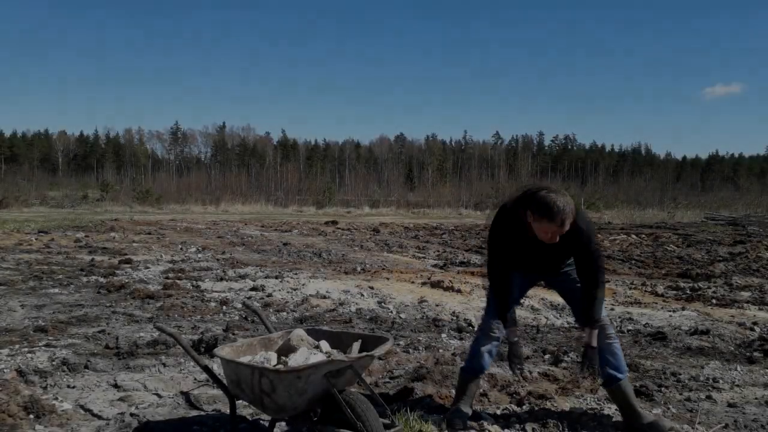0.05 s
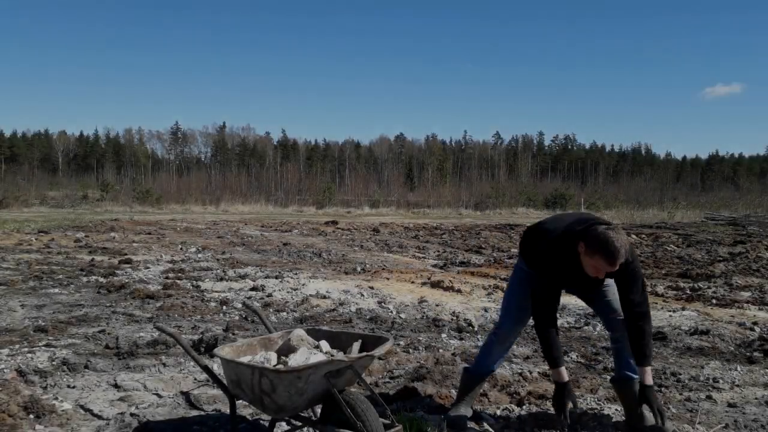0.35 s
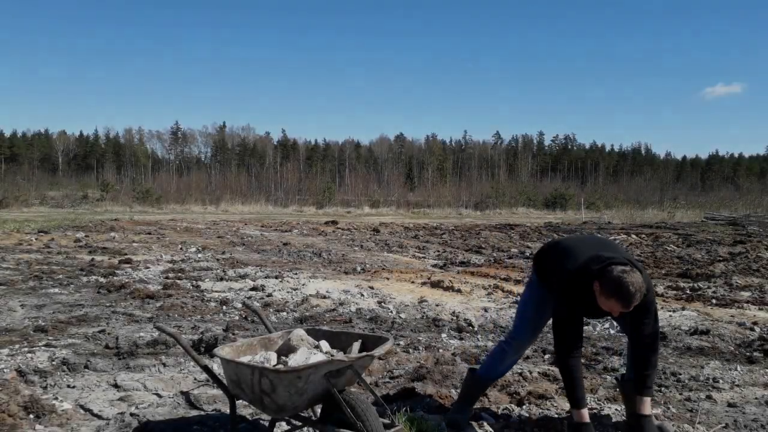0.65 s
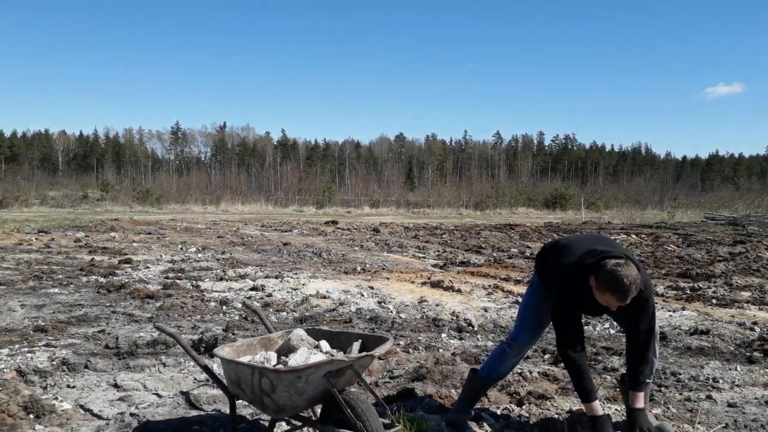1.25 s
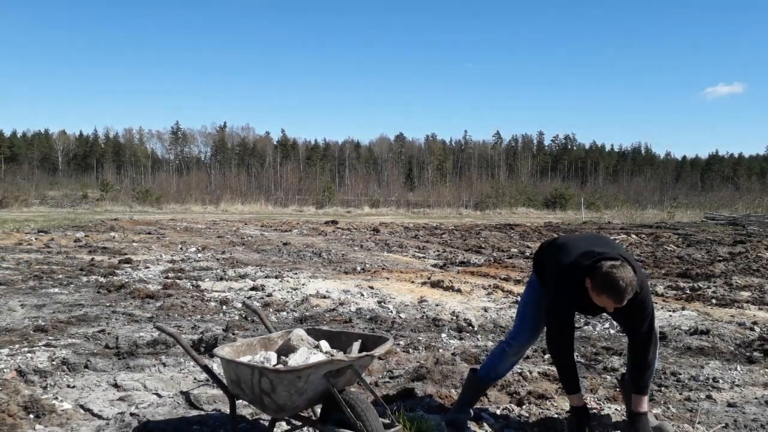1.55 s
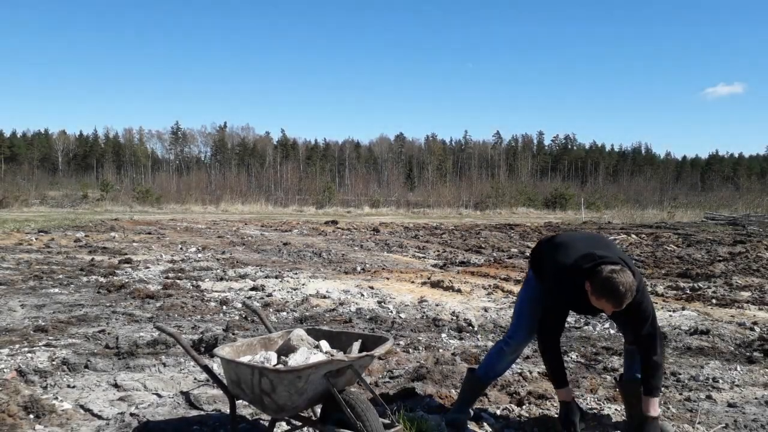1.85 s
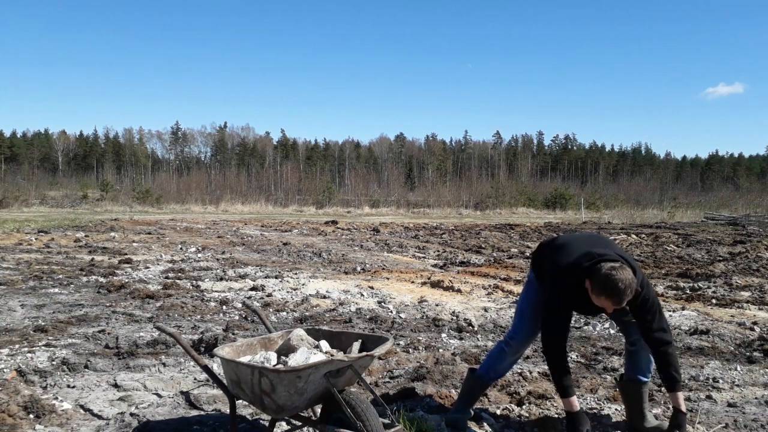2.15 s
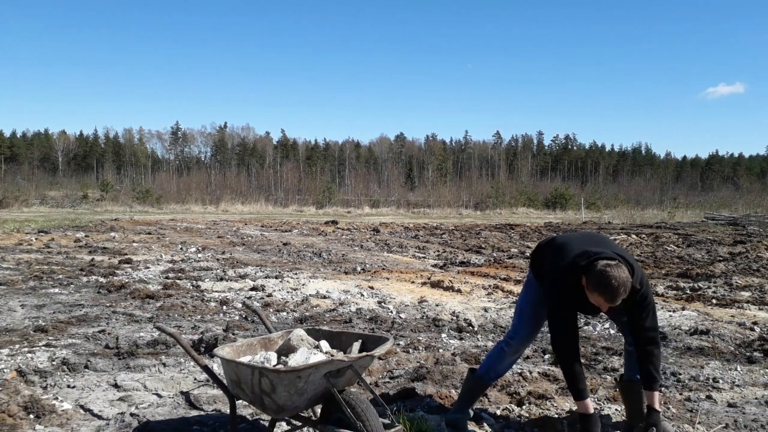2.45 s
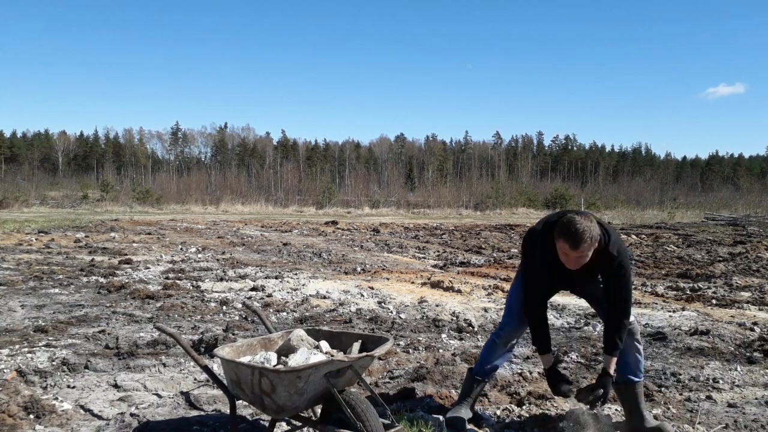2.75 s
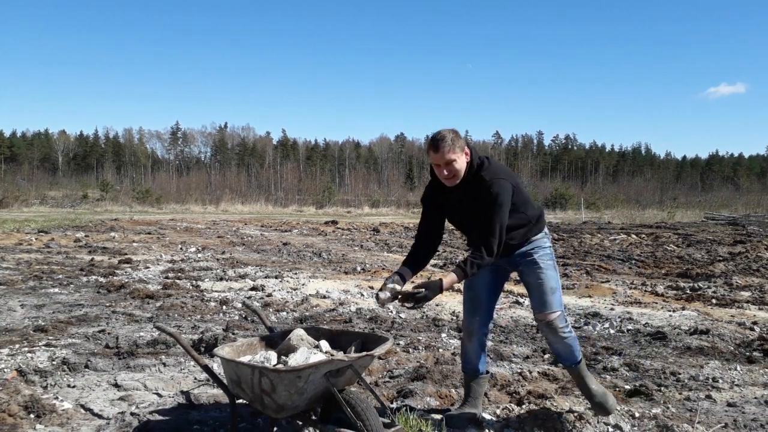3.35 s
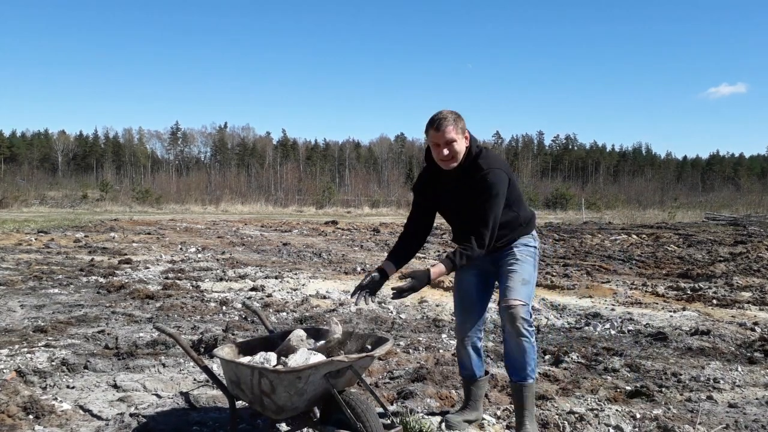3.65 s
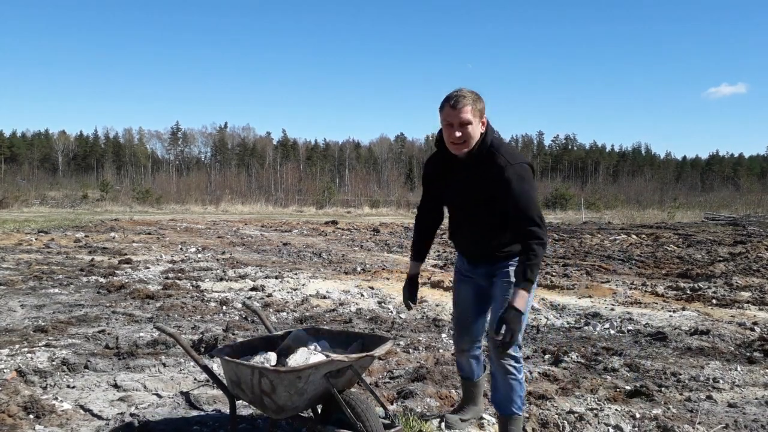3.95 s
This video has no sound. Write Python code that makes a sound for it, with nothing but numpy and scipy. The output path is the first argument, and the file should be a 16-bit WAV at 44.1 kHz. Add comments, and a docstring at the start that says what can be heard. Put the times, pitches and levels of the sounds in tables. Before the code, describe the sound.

Stones clatter and settle in a wheelbarrow in the first 0.3 seconds. A boot scuffs soil around 0.8 seconds, followed by sparse soft knocks, pebble taps and faint clothing rustle. A heavier knock comes at 2.4 seconds. From 3.7 seconds, several stones crack loudly onto the load, briefly ringing the tub. Throughout, wind flutters on the microphone in low, dull puffs over a faint rush of distant forest.

```python
"""Stones are gathered on an open field and tossed into a loaded wheelbarrow. First the load clatters and
settles while clothes rustle. A boot scuffs the soil, then pebbles tap, grit ticks and dull knocks sound now and
then. Near the end a run of stones cracks onto the load and rings the tub. Throughout, wind flutters on the
microphone in low, dull puffs over the faint rush of a far forest."""
import sys
import numpy as np
from scipy.fft import rfft, irfft, next_fast_len
from scipy.io import wavfile
from scipy.ndimage import map_coordinates

SR = 44100
rng = np.random.default_rng(int(sys.argv[2]) if len(sys.argv) > 2 else 0)


def wav_out(sig):
    """Save sig, one row per channel (or a flat mono array), as 16-bit PCM at SR to the path in sys.argv[1]."""
    wavfile.write(sys.argv[1], SR, np.round(np.clip(np.atleast_2d(sig).T, -1, 1) * 32767).astype(np.int16))


N = 176400
ATTACK_S = 0.00052

# Stone impacts. Each row: start in seconds, crack, clatter and chip levels in dB,
# clatter and chip T60 in seconds.
IMPACTS = [(-.002,-45,-34.5,-61,0.17,0.11),(.084,-62,-46,-70,0.19,0.055),(0.2016,-63,-47,-69,0.031,.03),(3.661,-54,-41.5,-44,0.038,.073),(3.6693,-50,-31.5,-49.5,0.075,.04),(3.6954,-25.5,-26.5,-37.5,0.054,.04),(3.702,-35,-25.5,-50,0.062,0.1),(3.7338,-36,-38,-52.5,.06,0.14),(3.777,-36,-33.5,-56,.05,.05),(3.784,-26,-28,-43.5,0.079,0.074),(3.799,-34.5,-32.5,-56,0.087,0.11),(3.8424,-44,-35.5,-73,.09,.1),(3.9265,-34,-35.5,-55,0.1,0.038)]
# Spectra of the three parts. Each row: frequency in Hz, density in dB.
CRACK_SPECTRUM = [(400,-8),(900,3),(2500,6),(5500,-14.5),(8000,-15),(16000,-36)]
CLATTER_SPECTRUM = [(150,-39),(400,10.5),(750,-1),(1000,0.5),(1500,-5),(2300,-3.5),(3100,-11),(4500,-21),(7000,-32),(16000,-56)]
CHIP_SPECTRUM = [(800,2.5),(2500,-3),(4200,-1),(5500,3),(7300,-7),(8300,-3),(9400,3.5),(10700,-5),(12000,-4),(14000,-8),(16000,-13)]
def stones():
    """Impact excitation: each contact cracks, rattles the load and chips the stone."""
    cracks = sum(amp(db) * strike(s, t60=0.015) for s, db, *_ in IMPACTS)
    clatter = sum(amp(db) * strike(s, t60) for s, _, db, _, t60, _ in IMPACTS)
    chips = sum(amp(db) * strike(s, t60) for s, _, _, db, _, t60 in IMPACTS)
    return (cracks * noise(CRACK_SPECTRUM)
            + clatter * noise(CLATTER_SPECTRUM, grain_db=2.5)
            + chips * noise(CHIP_SPECTRUM, grain_db=-2.5))


# Modes of the tub. Each row: frequency in Hz, relative level in dB, T60 in seconds.
TUB_MODES = [(743,8,0.14),(1177,-4.5,0.39),(1357,-2,0.27),(1440,-8,0.3),(1666,-6,0.2),(1854,-6,.22),(1956,-2.5,0.26),(2250,-12,0.25),(2430,-6,.18),(2640,-17,0.12),(3400,-8,0.15)]
def tub():
    """Damped modal vibration: each impact rings the tub, which the shifting load detunes."""
    t = clock()
    out = np.zeros(N)
    for s, _, clatter_db, *_ in IMPACTS:
        near = (t > s) & (t < s + .5)
        age = t[near] - s
        attack = 1 - np.exp(-age / ATTACK_S)
        for hz, db, t60 in TUB_MODES:
            size, phase, detune = rng.standard_normal(3)
            envelope = attack * amp(clatter_db + db + 2 * size - 60 * age / t60)
            out[near] += envelope * np.sin(2 * np.pi * (hz * (1 + .009 * detune) * age + phase))
    return amp(-19) * out


# Dull knocks. Each row: time in seconds, peak level in dB, pitch in Hz.
DULL_KNOCKS = [(.1455,-28,533),(.204,-34,1000),(.443,-40,600),(.939,-35,560),(.979,-32,520),(1.137,-43,570),(1.205,-39,590),(1.302,-40,560),(1.826,-35,560),(2.4402,-22.5,877),(2.4545,-28,564),(3.7045,-16.5,800),(3.7865,-22,750)]
def knocks():
    """Heavy damping: a dull knock dies within a few cycles."""
    return thuds(DULL_KNOCKS, rise=0.22, fall=1.42, sag=0.14)


# Modes of a stone edge. Each row: frequency in Hz, relative level in dB, T60 in seconds.
EDGE_MODES = [(8200,-4,0.049),(10600,-2,0.041),(10670,0.5,0.046),(13600,-2,.032),(14000,0,.032)]
def stone_edge(start_s=3.696, level_db=-39):
    """Free vibration: a hard edge, hit squarely, rings briefly and very high."""
    return sum(amp(level_db + db) * strike(start_s, t60) * np.sin(2 * np.pi * hz * clock())
               for hz, db, t60 in EDGE_MODES)


# Pebble taps. Each row: start in seconds, level in dB.
PEBBLE_TAPS = [(0.204,-49),(2.152,-55),(2.310,-48.5),(2.346,-46),(3.662,-36),(3.763,-40)]
# Their spectrum. Each row: frequency in Hz, density in dB.
PEBBLE_SPECTRUM = [(600,-11),(1400,-10),(1850,6),(2300,-5.5),(4000,-26),(9000,-32),(16000,-33)]
def pebbles():
    """Light impacts: small stones collide in the hands."""
    return sum(amp(db) * strike(s, t60=0.068) for s, db in PEBBLE_TAPS) * noise(PEBBLE_SPECTRUM)


# Grit ticks. Each row: start in seconds, level in dB, T60 in seconds.
GRIT_TICKS = [(0.037,-39.5,.07),(.057,-44.5,0.095),(.086,-66,.1),(0.125,-47.5,.046),(.138,-50,0.022),(0.1448,-41,0.063),(0.205,-51,.015),(0.215,-56,.048),(.379,-61,0.055),(0.98,-64.5,.08),(1.48,-59.5,0.031),(2.154,-58.5,.035),(2.255,-52.5,0.017),(2.313,-55,.025),(2.408,-60,.025),(2.508,-63,.03),(2.567,-64,.025),(3.271,-59,.015),(3.603,-43,0.0096),(3.723,-45.5,0.068),(3.8315,-43,0.018)]
# Their spectrum. Each row: frequency in Hz, density in dB.
GRIT_SPECTRUM = [(500,-1.5),(2000,-4.5),(5000,-7.5),(7500,-12),(8700,-9),(9400,-2),(11500,-9),(13500,-11),(16000,-17)]
def grit():
    """Granular contact: grit crunches in short broadband bursts."""
    envelope = sum(amp(db) * strike(s, t60) for s, db, t60 in GRIT_TICKS)
    return envelope * noise(GRIT_SPECTRUM, grain_db=1)


# Pushes of the boot. Each row: start and end in seconds, relative level in dB.
BOOT_PUSHES = [(.59,.75,-61),(.7,.77,-55.5),(.781,.81,-46),(.826,.85,-44),(.853,.886,-42.5)]
# Spectrum of the soil. Each row: frequency in Hz, density in dB.
SOIL_SPECTRUM = [(250,5.5),(550,5),(1200,-0.5),(1700,-4),(2600,0),(3600,-10),(5000,-11),(7500,-21),(9500,-12),(13000,-20),(16000,-28)]
# Resonances of loose stones. Each row: frequency and bandwidth in Hz, gain in dB.
LOOSE_STONES = [(545,114,7),(1243,35,1.5),(1740,67,-0.5),(2340,100,-13),(2880,170,-14),(3680,100,-6)]
# Single catches of the sole. Each row: start in seconds, relative level in dB, pitch in Hz.
SOLE_CATCHES = [(.778,-39,603),(0.7857,-48,1160),(.786,-54,2920),(0.823,-48.5,2920),(0.854,-46,1230),(0.8552,-43,2340),(0.8838,-45,1240)]
def boot():
    """Stick-slip friction: the sole slides through soil, and each stone it catches rasps."""
    def resonances(f):
        return sum((-1) ** k * amp(db) * 1j * f * width / (hz * hz - f * f + 1j * f * width)
                   for k, (hz, width, db) in enumerate(LOOSE_STONES))

    slip = amp(-2) * noise(SOIL_SPECTRUM, grain_db=1)
    fine_catches = amp(-2.5) * unit(filtered(ticks(per_s=350), resonances))
    rasps = sum(amp(db) * strike(s, t60=0.034) * band(hz, width=0.18) for s, db, hz in SOLE_CATCHES)
    return strokes(BOOT_PUSHES, rise_s=0.0047, fall_s=.011) * (slip + fine_catches) + 2 * rasps


# Twists of the soles. Each row: start and end in seconds, level in dB.
SOLE_TWISTS = [(.17,.30,-69),(.30,.42,-69.5),(.44,.57,-67.5),(.69,.83,-64.5),(.87,.94,-67.5),(2.88,3.02,-69.5),(3.16,3.4,-79),(3.932,3.948,-49)]
# Spectrum of the gravel. Each row: frequency in Hz, density in dB.
GRAVEL_SPECTRUM = [(1200,-11),(1900,6.5),(2900,-3.5),(3500,-3),(4200,-12),(5100,-18),(6500,-29),(12000,-34)]
def gravel():
    """Granular friction: fine gravel grinds softly as the weight shifts."""
    return strokes(SOLE_TWISTS, rise_s=0.0081, fall_s=0.019) * noise(GRAVEL_SPECTRUM, grain_db=3)


# Body movements. Each row: start and end in seconds, level in dB.
MOVES = [(0,.1,-61),(.17,.32,-72.5),(.6,.67,-62),(.74,.93,-73),(1.02,1.075,-65.5),(1.1,1.26,-72),(1.28,1.44,-75.5),(1.45,1.48,-73),(1.595,1.635,-66),(1.67,1.76,-73.5),(1.89,1.915,-68.5),(2.16,2.37,-69),(2.205,2.25,-64),(2.42,2.6,-73.5),(2.89,3.01,-72),(3.365,3.52,-67.5),(3.4,3.46,-64.5),(3.75,3.99,-67)]
# Spectrum of the fabric. Each row: frequency in Hz, density in dB.
CLOTH_SPECTRUM = [(1200,2.5),(2800,-0.5),(4500,-6.5),(6000,-5),(8400,-7),(9400,1.5),(12500,-3),(14000,-8.5),(16000,-13.5)]
def clothes():
    """Sliding friction: fabric swishes and crinkles with each reach."""
    swish = noise(CLOTH_SPECTRUM, grain_db=3)
    crinkle = amp(-8) * coloured(ticks(per_s=310), CLOTH_SPECTRUM)
    flicker = amp(1.8 * wobble(60))
    return strokes(MOVES, rise_s=0.038, fall_s=0.036) * flicker * (swish + crinkle)


# Wind strength. Each row: time in seconds, relative level in dB.
WIND_STRENGTH = [(0,-42.5),(.11,-44),(0.161,-40),(.3,-34.5),(.36,-42.5),(0.461,-40.5),(.62,-40.5),(0.771,-38.5),(.85,-52),(.95,-35.5),(1.08,-41),(1.328,-40),(1.409,-48.5),(1.6,-44),(1.74,-42.5),(1.86,-34.5),(1.93,-43),(2.02,-44),(2.18,-40),(2.34,-37.5),(2.6,-41),(2.79,-40.5),(2.86,-45),(3.0,-43.5),(3.2,-45.5),(3.36,-50),(3.47,-42.5),(3.54,-39.5),(3.63,-44.5),(3.729,-34),(3.902,-36.5),(4,-46)]
# Spectrum of the buffeting. Each row: frequency in Hz, density in dB.
BUFFET_SPECTRUM = [(20,-49),(40,-23),(62,-6),(85,-1.5),(130,1),(200,-5.5),(300,-13),(450,-23.5),(700,-37),(1200,-56),(2500,-95)]
# Single puffs. Each row: time in seconds, peak level in dB, pitch in Hz.
WIND_PUFFS = [(.146,-19.5,245),(.156,-22.5,230),(.205,-26.5,176),(.257,-19.5,141),(.291,-25.5,160),(.402,-24.5,271),(.444,-30,267),(.462,-27,202),(.941,-34,199),(.966,-26,222),(.980,-17,195),(1.045,-18.5,183),(1.104,-23,190),(1.142,-25,170),(1.208,-23,197),(1.303,-37,243),(1.82,-21.5,190),(1.877,-24,206),(1.955,-24.5,149),(2.064,-24,143),(2.197,-24.5,256),(2.312,-25.5,200),(2.439,-7,398),(2.447,-17,210),(2.455,-16,235),(2.594,-23,143),(2.72,-26,159),(2.765,-23,162),(2.905,-25.5,158),(2.992,-20.5,162),(3.497,-24.5,182),(3.537,-21.5,172),(3.587,-23,115),(3.678,-20,300),(3.708,-9.5,192),(3.717,-13,133),(3.775,-15,182),(3.892,-22,212)]
def wind(flutter_db=3.5, split_hz=173, upper_swing=1.97):
    """Turbulence: eddies buffet the microphone, and the stronger ones sound brighter."""
    strength_db = np.interp(clock(), *np.transpose(WIND_STRENGTH))
    mean_db = strength_db.mean()
    eddy_db = strength_db - mean_db + flutter_db * np.tanh(wobble(40))
    flow = noise(BUFFET_SPECTRUM)
    low = filtered(flow, lambda hz: 1 / (1 + (hz / split_hz) ** 4))
    buffeting = low * amp(eddy_db) + (flow - low) * amp(upper_swing * eddy_db)
    return amp(mean_db + 2) * buffeting + thuds(WIND_PUFFS, rise=0.25, fall=0.47, sag=0.11)


# Swell of the trees. Each row: time in seconds, relative level in dB.
TREE_SWELL = [(0,-62),(.55,-64),(1.1,-66),(1.8,-65),(2.3,-63),(2.8,-63.5),(3.1,-62.5),(4,-61.5)]
# Their spectrum. Each row: frequency in Hz, density in dB.
FOREST_SPECTRUM = [(30,-14),(120,16),(300,-2.5),(600,2),(900,1.5),(1300,-4),(2000,-10),(2800,-20),(4200,-28.5),(8300,-32),(9600,-24),(12000,-30),(16000,-31)]
def forest(gain_db=8.5, sway_db=1):
    """Incoherent summation: far trees merge into one slowly swelling rush."""
    swell_db = np.interp(clock(), *np.transpose(TREE_SWELL))
    return amp(gain_db + swell_db + sway_db * wobble(5.7)) * noise(FOREST_SPECTRUM)


def strike(s, t60):
    """Exponential decay after a sharp attack at s seconds."""
    age = np.clip(clock() - s, 0, 2)
    return (1 - np.exp(-age / ATTACK_S)) * amp(-60 * age / t60)


def thuds(rows, rise, fall, sag):
    """Damped pulses: rise and fall are in cycles; sag sets the fractional pitch drop."""
    out = np.zeros(N)
    for s, db, hz in rows:
        near = np.abs(clock() - s) < .04
        cycles = (clock()[near] - s) * hz
        shape = np.exp(-np.logaddexp(-cycles / rise, cycles / fall))
        phase = cycles - sag * (np.hypot(cycles, 1) - 1)
        out[near] += amp(db) * shape / shape.max() * np.sin(2 * np.pi * phase)
    return out


def strokes(rows, rise_s, fall_s):
    """Power addition of rubbing strokes that swell, hold and die away."""
    t = clock()
    envelopes = (amp(db) * np.exp(np.minimum(t - start, 0) / rise_s - np.maximum(t - end, 0) / fall_s)
                 for start, end, db in rows)
    return np.sqrt(sum(envelope ** 2 for envelope in envelopes))


def noise(points, grain_db=0):
    """Coloured noise; amplitude modulation by grain_db clumps it into tiny contacts."""
    return coloured(rng.standard_normal(N) * amp(grain_db * wobble(900)), points)


def band(hz, width):
    """Narrowband noise of rms 1; width is a fraction of the pitch."""
    return unit(filtered(rng.standard_normal(N), lambda f: 1 / (1 + 2 * ((f - hz) / (width * hz)) ** 2)))


def ticks(per_s):
    """A Poisson process of tiny contacts of random size."""
    return (rng.random(N) < per_s / SR) * rng.standard_normal(N)


def wobble(rate):
    """Spline interpolation through rate random knots a second."""
    return map_coordinates(rng.standard_normal(int(N * rate / SR) + 4), [clock() * rate])


def coloured(x, points):
    """Spectral shaping by (Hz, dB) points, scaled to rms 1."""
    hz, db = np.transpose(points)
    return unit(filtered(x, lambda f: amp(np.interp(np.log(f + 1), np.log(hz + 1), db))))


def filtered(x, response):
    """Linear filtering: the spectrum times a frequency response."""
    size = next_fast_len(N + 8192)
    return irfft(rfft(x, size) * response(np.fft.rfftfreq(size, 1 / SR)), size)[:N]


def amp(db):
    return 10 ** (np.asarray(db) / 20)


def unit(x):
    return x / np.sqrt(np.mean(x ** 2) + 1e-20)


def clock():
    return np.arange(N) / SR


def scene():
    """Superposition: all sources add in one channel."""
    hits = stones() + tub() + knocks() + stone_edge()
    gathering = pebbles() + grit() + boot() + gravel() + clothes()
    return (hits + gathering + wind() + forest())[None]


def record(dry):
    """Band limiting: the deepest rumble rolls off and the highest treble is cut."""
    low_hz, top_hz = 40, 15850
    return filtered(dry[0], lambda hz: hz ** 2 / np.hypot(hz ** 2, low_hz ** 2) * (hz < top_hz))[None]


dry = scene()
out = record(dry)
wav_out(out)
```